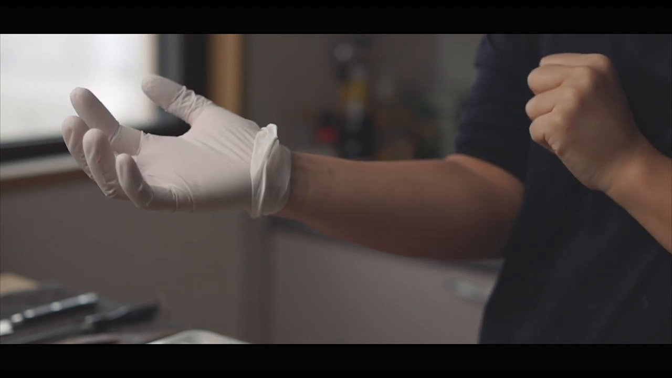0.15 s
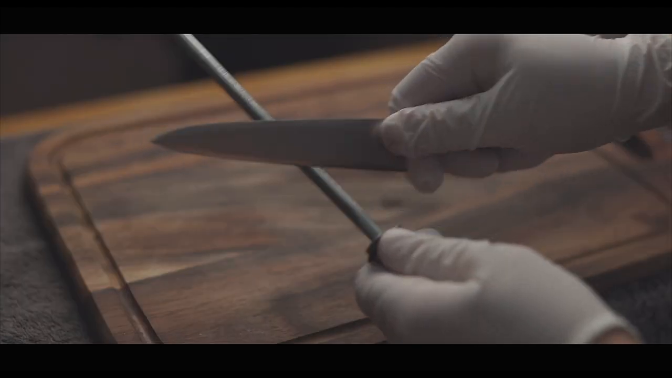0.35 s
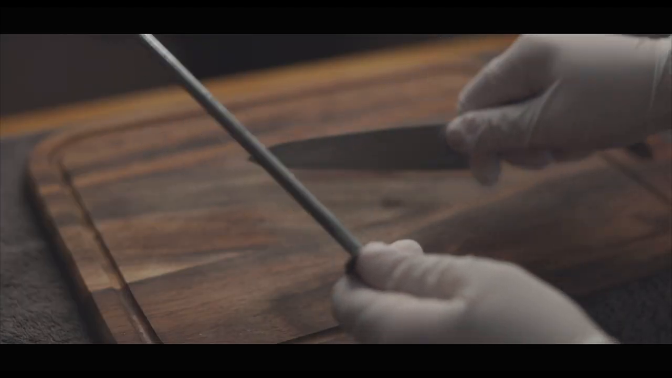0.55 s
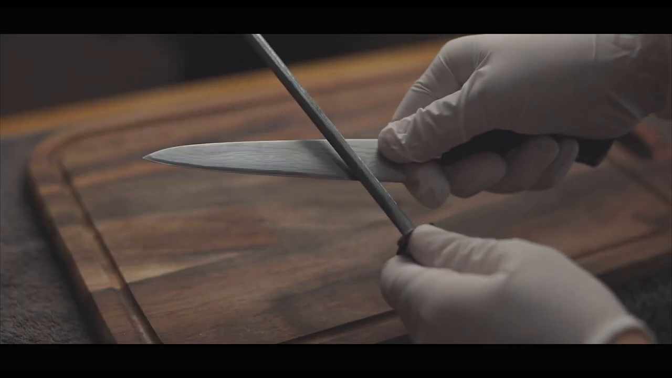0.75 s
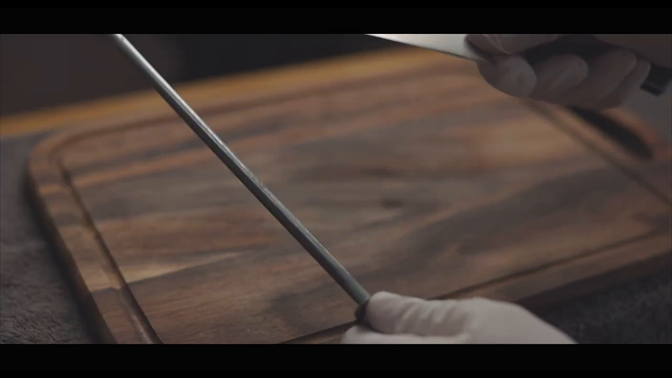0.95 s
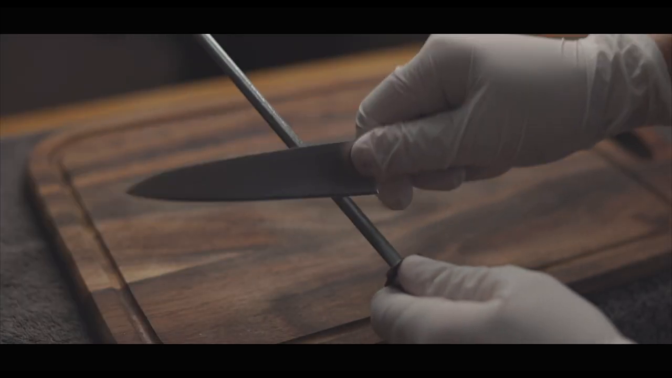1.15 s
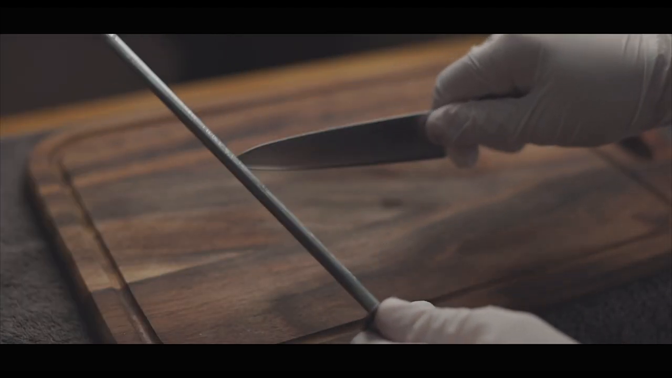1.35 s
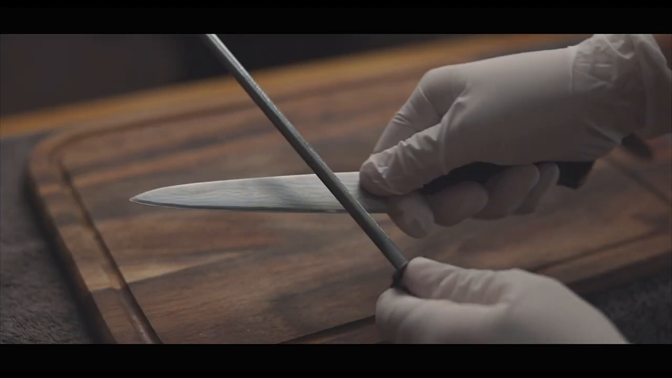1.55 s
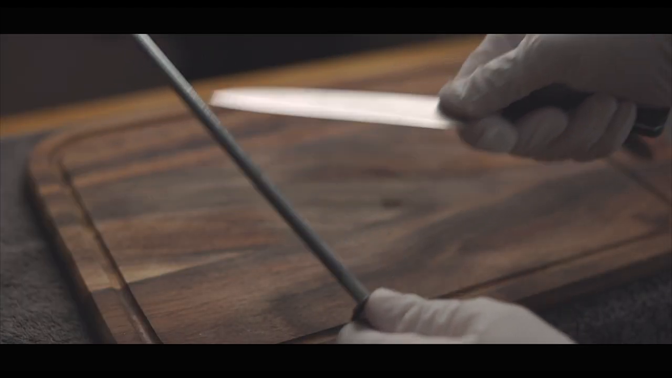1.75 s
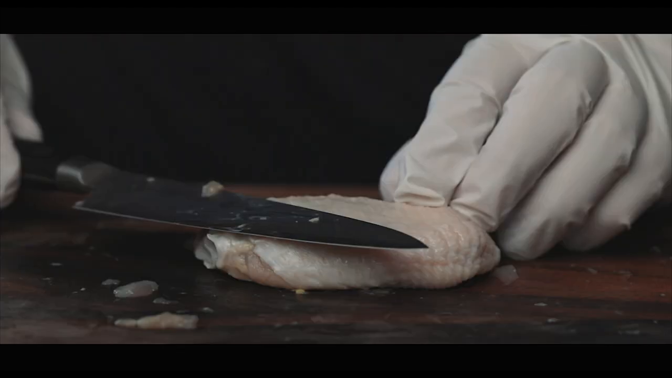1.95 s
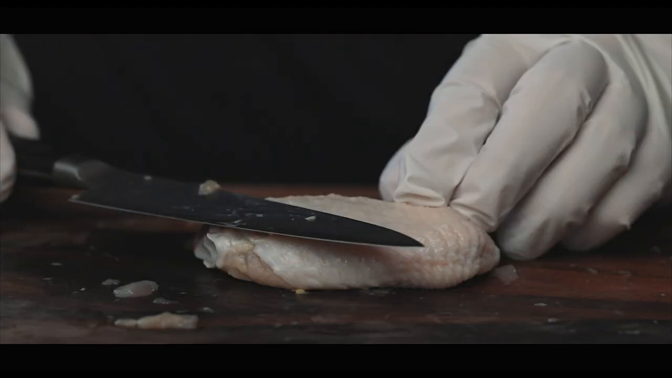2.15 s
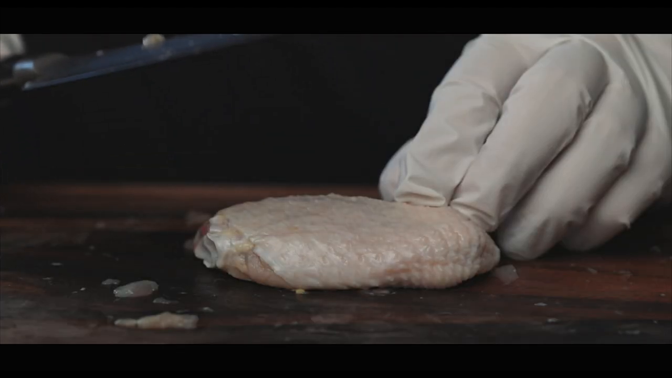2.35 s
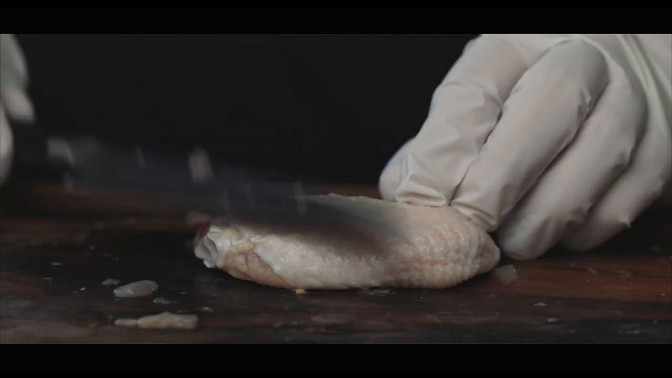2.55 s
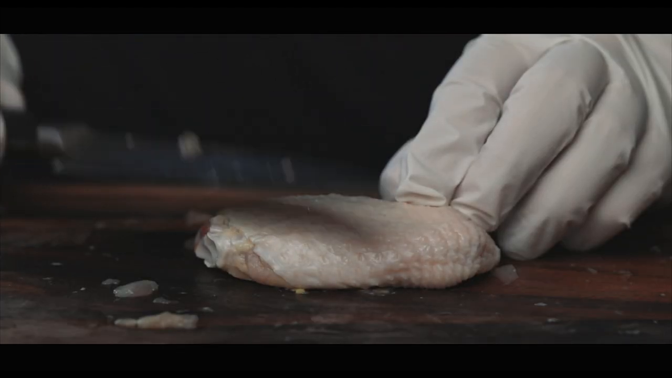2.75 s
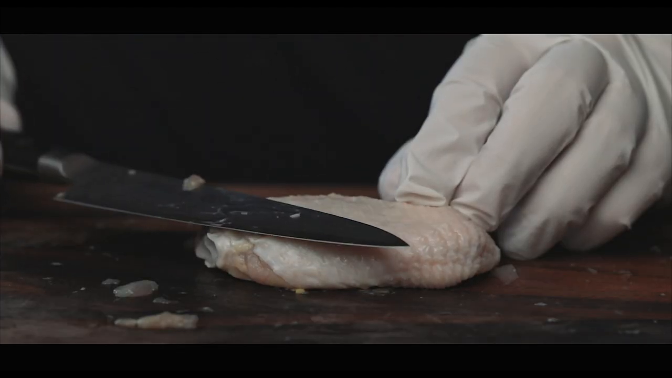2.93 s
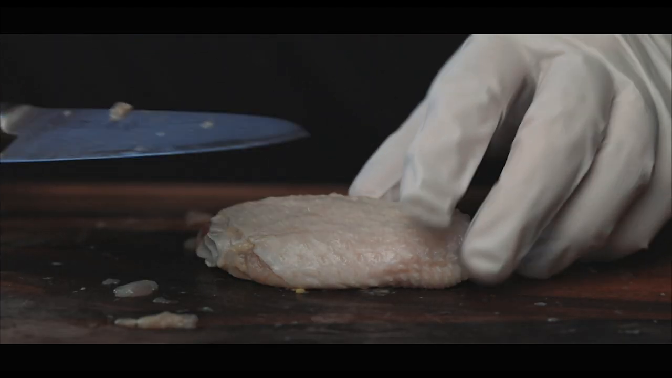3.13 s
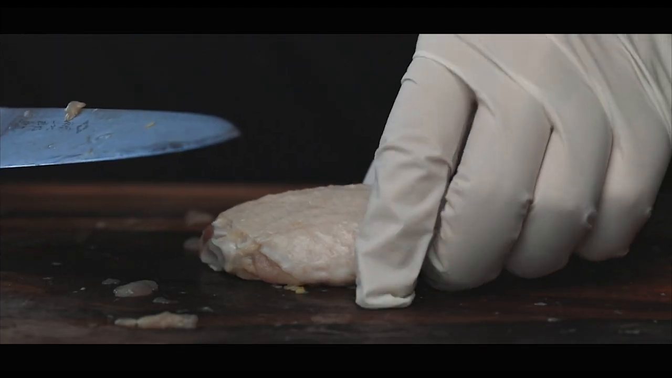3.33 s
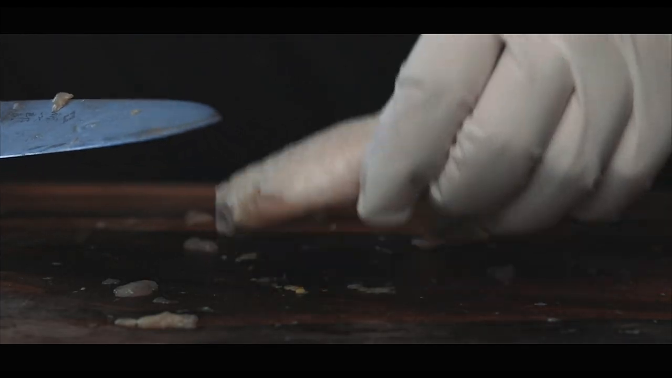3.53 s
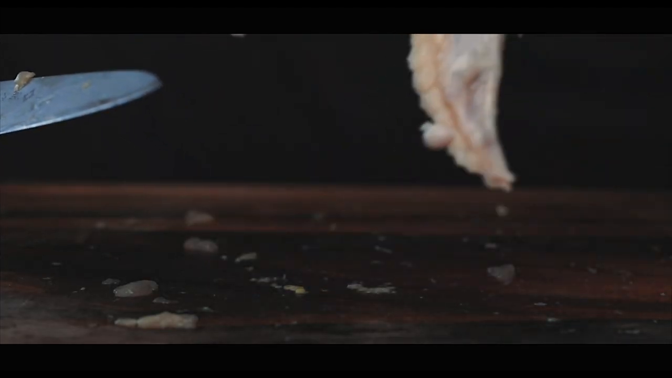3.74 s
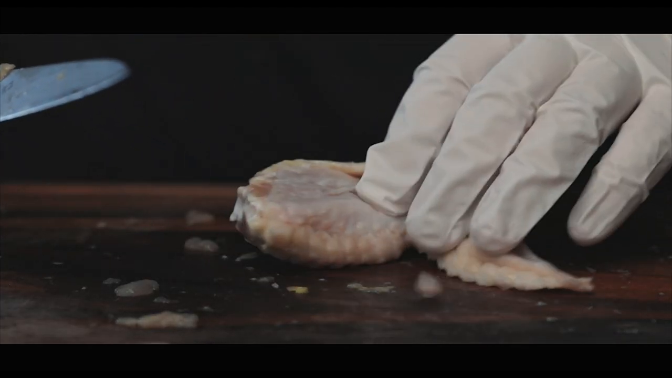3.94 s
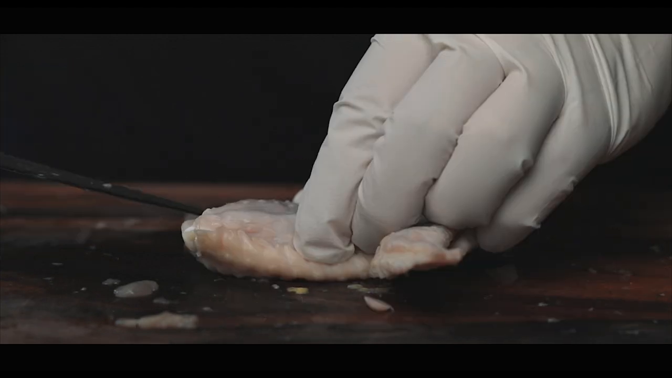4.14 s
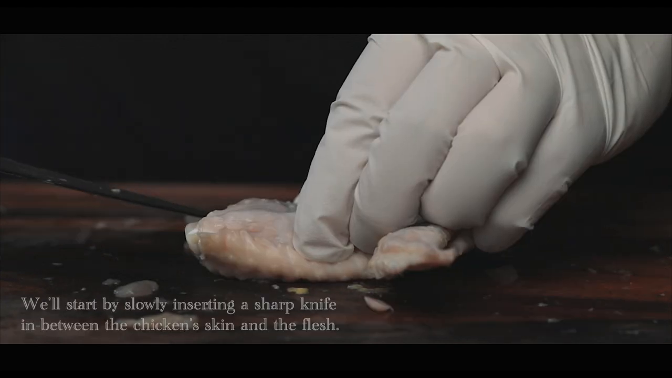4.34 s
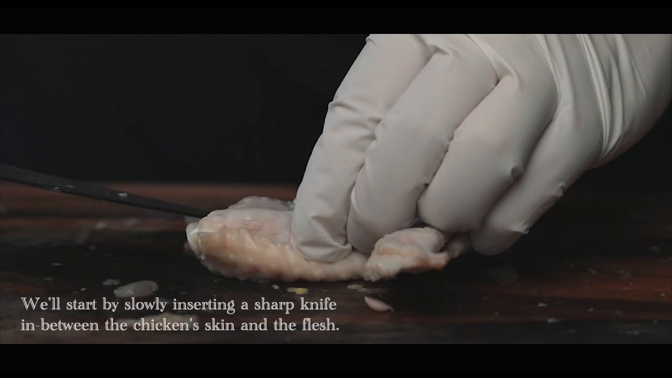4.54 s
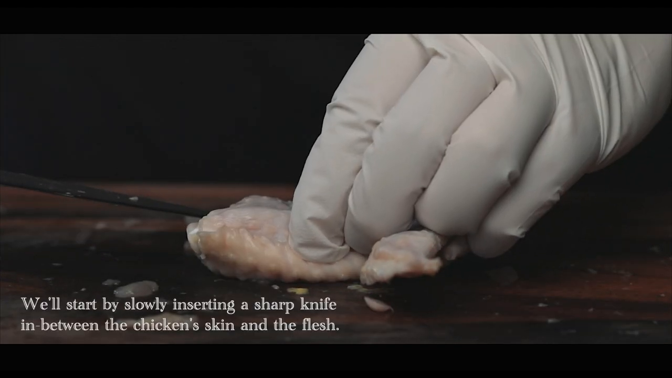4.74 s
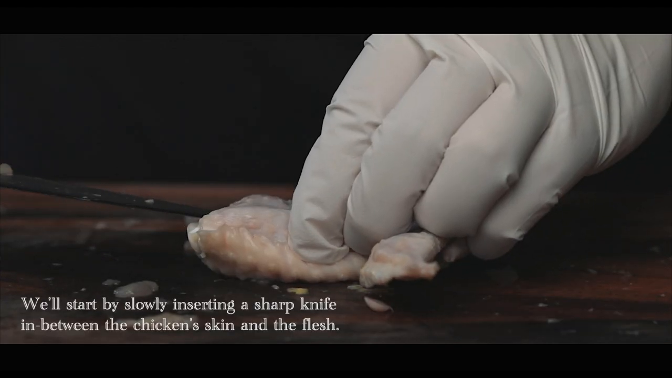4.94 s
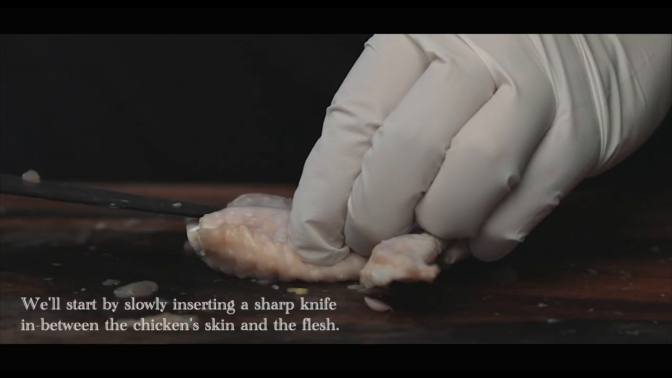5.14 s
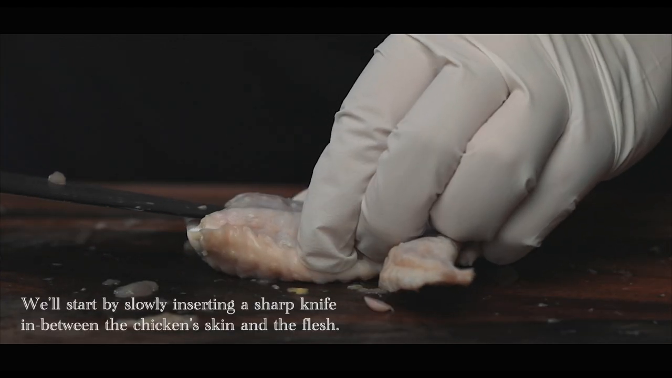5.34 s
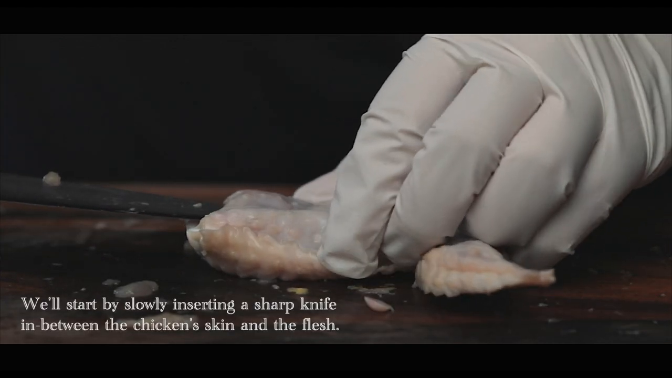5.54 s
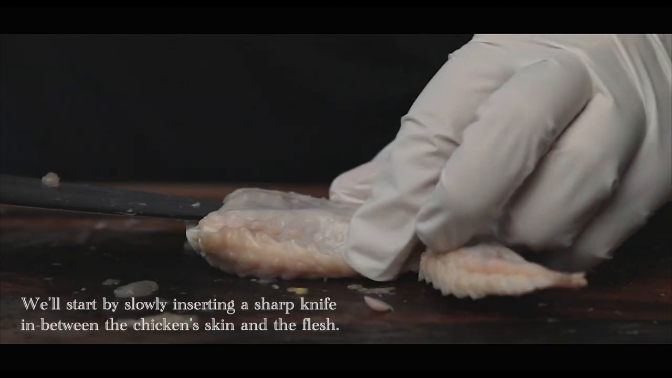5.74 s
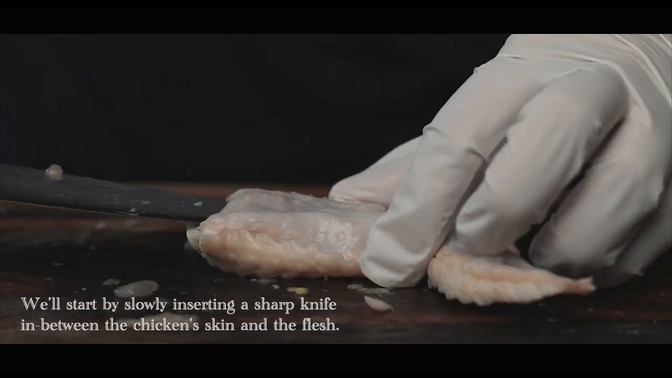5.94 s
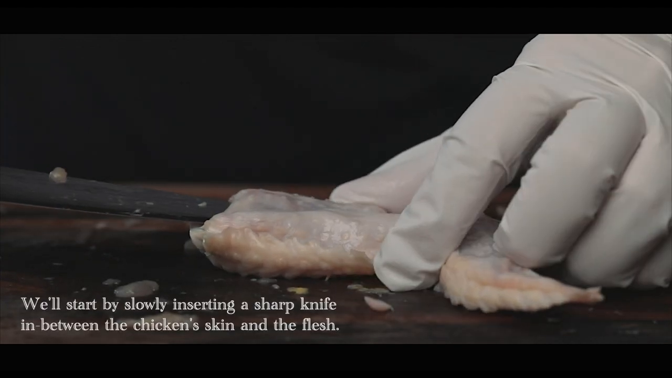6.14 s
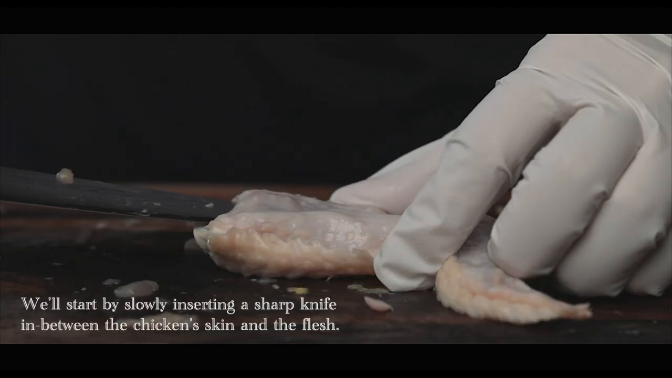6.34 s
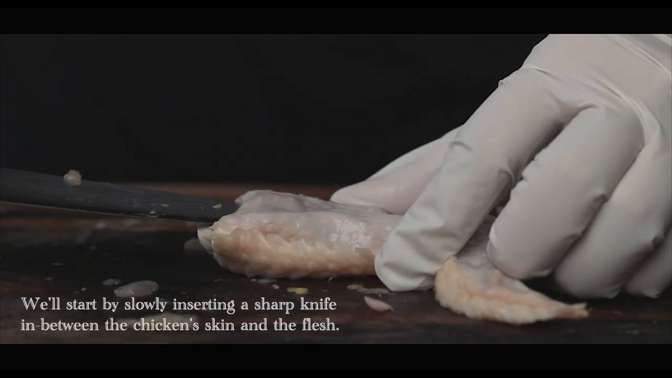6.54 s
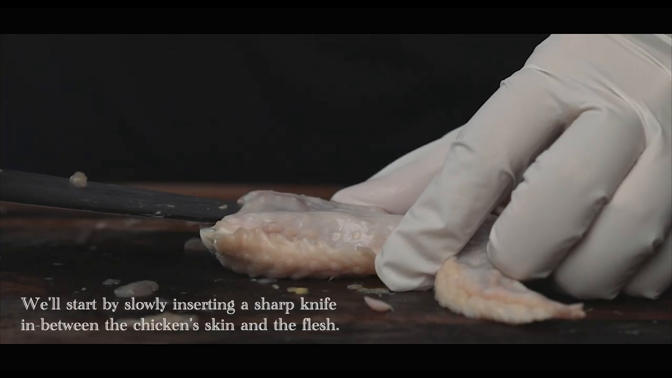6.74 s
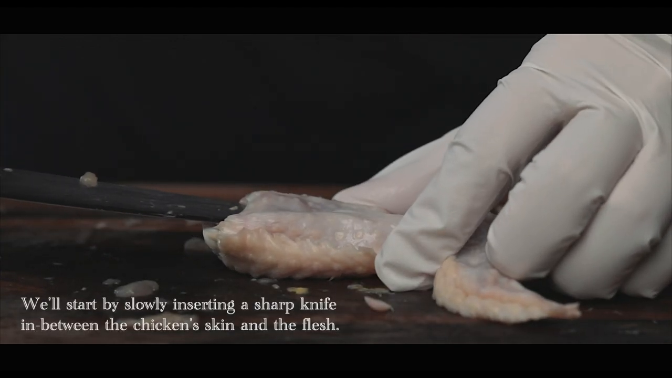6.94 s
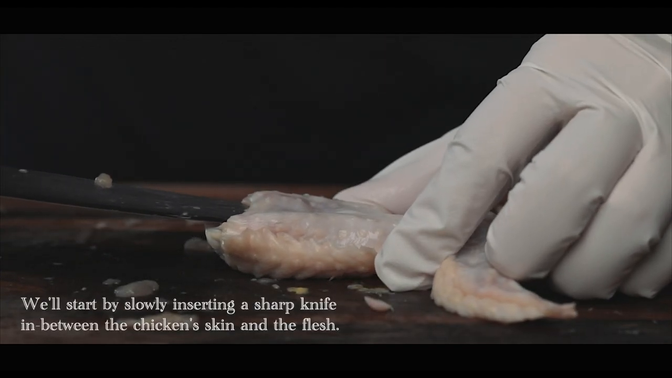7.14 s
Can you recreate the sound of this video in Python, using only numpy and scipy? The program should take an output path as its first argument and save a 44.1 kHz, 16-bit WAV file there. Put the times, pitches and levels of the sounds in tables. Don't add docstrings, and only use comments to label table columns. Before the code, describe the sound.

Close to the microphone in a quiet kitchen, the tail of a glove snap dies away, then a knife edge rasps down a honing steel four times, bright and ringing, the last stroke hardest. Afterwards soft knocks sound on a wooden board, with sharp ticks and wet rubbing, then a harder knock and slap as raw meat lands. Faint squelches, sparse sticky clicks and low wooden groans follow over gentle room hum.

```python
import sys
import numpy as np
from scipy import signal
from scipy.fft import rfft, irfft, next_fast_len
from scipy.io import wavfile
from scipy.ndimage import uniform_filter1d

SR = 44100
rng = np.random.default_rng(int(sys.argv[2]) if len(sys.argv) > 2 else 0)


def bounce(signal):
    frames = np.transpose(np.atleast_2d(signal))
    limited = np.clip(frames, -1, 1)
    pcm = np.round(limited * 32767).astype(np.int16)
    wavfile.write(sys.argv[1], SR, pcm)


def invert_db(x):
    u = np.asarray(x, float) / 20
    return 10 ** u


N = 321048
T = np.arange(N) / SR


def evened(x):
    return x / np.sqrt(np.mean(x ** 2) + 1e-20)


def noise(*shape):
    return rng.standard_normal(shape)


def read(points, hz):
    f, value = np.transpose(points)
    return np.interp(np.log(hz + 1), np.log(f + 1), value)


def add(mix, s, sound):
    part = mix[round(s * SR):][:len(sound)]
    part += sound[:len(part)]


def resonate(x, hz, width):
    turn = np.exp(2j * np.pi * np.cumsum(hz * np.ones(len(x))) / SR)
    r = np.exp(-np.pi * width / SR)
    return 2 * (turn * signal.lfilter([1 - r], [1, -r], x / turn)).real


def coloured(x, points):
    n = next_fast_len(len(x))
    gain = invert_db(read(points, np.fft.rfftfreq(n, 1 / SR)))
    return evened(irfft(rfft(x, n) * gain, n)[:len(x)])


def drift(count, size):
    return evened(uniform_filter1d(uniform_filter1d(noise(count), size), size))


def band(x, lo_hz, hi_hz):
    return evened(signal.sosfilt(signal.butter(2, [lo_hz, hi_hz], "band", fs=SR, output="sos"), x))


def above(x, hz):
    return signal.sosfilt(signal.butter(4, hz, "high", fs=SR, output="sos"), x)


def rings(modes, t, lift_db=0, above_hz=1e5, turn=0):
    total = 0
    for hz, db, t60 in modes:
        share = min(max(2 * hz / above_hz - 1, 0), 1)
        total = total + invert_db(db + lift_db * share - 60 * t / t60) * np.sin(2 * np.pi * (hz * t + turn))
    return total


def swells(rows, rise=None, fall=None):
    t = T[::32]
    curves = []
    for s, db, *shape in rows:
        growing = (s - t) / (rise or shape[0])
        dying = (t - s) / (fall or shape[1])
        curves.append(invert_db(db - 20 * np.where(t < s, growing, dying)))
    return np.array(curves)


def full(curve):
    return np.interp(T, T[::32], curve)


def noise_tail(x, t60s):
    hz, t, z = signal.stft(x, SR, nperseg=128)
    return signal.istft(z * invert_db(-60 * t / read(t60s, hz)[:, None]), SR, nperseg=128)[1]


def room(x, t60s, start):
    tails = noise_tail(noise(3, SR * 3 // 4), t60s)
    tails = tails * (np.arange(tails.shape[1]) > start * SR)
    turns = np.sqrt(2 / 3) * np.cos(2 * np.pi * (11 * T + np.arange(3)[:, None] / 3))
    return signal.oaconvolve(x * turns, tails / np.linalg.norm(tails[0]), axes=1).sum(0)[:N]


def background():
    # [f/Hz, density/dB]
    air_colour = [(18, -30.5), (30, -3.5), (51, -12), (106, -32.5), (227, -31.5), (473, -44), (540, -45),
                  (801, -38.5), (962, -51), (3140, -51.5), (7670, -45.5), (8300, -43), (9460, -47),
                  (12300, -41), (16000, -50.5)]
    # [f/Hz, level/dB, width/Hz]
    whines = [(222, -91, 12), (797, -98, 8), (8140, -89, 30), (12200, -95, 90)]
    out = invert_db(-72.5 + 1.4 * drift(N, size=9000)) * coloured(noise(N), air_colour)

    bustle_on = np.clip((2.55 - T) * 4, 0, 1)
    bustle = noise(N)
    murmur = (invert_db(-56 - 30 * T) + invert_db(-82.5)) * band(bustle, 60, 300)
    fade_s, fall_db_per_s, hush_db = 2.07, 19.5, -4
    hiss_db = -68 - fall_db_per_s * np.maximum(T - fade_s, 0) + hush_db * (T > fade_s)
    out += bustle_on * (murmur + invert_db(hiss_db) * band(bustle, 1100, 13000))

    waver = invert_db(4.9 * drift(N, size=12000))
    return out + waver * sum(invert_db(db) * evened(resonate(noise(N), hz, width)) for hz, db, width in whines)


def sway():
    # [t/s, level/dB]
    nudges = [(.37, -40.5), (1.11, -43), (1.79, -42), (2.29, -59), (3.0, -41), (3.2, -38), (4.06, -38.5),
              (4.46, -48.5), (5.3, -50), (5.88, -50.5), (6.24, -39), (6.72, -52), (7.12, -56)]
    # [t/s, level/dB]
    thuds = [(2.97, -46.5), (3.04, -53), (3.302, -46.5), (3.458, -50), (3.532, -54), (3.98, -36),
             (4.104, -45)]
    sway_hz, start_db, fall_db_per_s = 13.2, -16.5, 17
    change_s, next_change_s = .3513, 4.172
    free = invert_db(start_db - fall_db_per_s * T) * np.cos(2 * np.pi * sway_hz * (T - change_s))
    wobble = band(resonate(noise(N), sway_hz, 16.0), 5.3, 19.0)
    nudged = full(swells(nudges, rise=.25, fall=.2).sum(0)) * wobble
    out = np.where(T < change_s, free, nudged)

    rumble = band(band(noise(N), 31.06, 75), 27, 80)
    pressed = full(swells(thuds, rise=.045, fall=.1).sum(0)) * rumble
    jolt = invert_db(-38) * np.exp(-abs(T - next_change_s) / .012)
    return out + (pressed + jolt) * (T < next_change_s)


def snap():
    # [f/Hz, density/dB]
    snap_colour = [(59, -35), (100, -6), (163, -24), (910, -16), (1950, -20), (4470, -18), (6020, -27.5),
                   (9610, -27.5), (16000, -45.5)]
    # [f/Hz, t60/s]
    snap_t60 = [(200, .3), (2000, 0.26), (6000, 0.23), (15000, 0.18)]
    tail = invert_db(-26) * noise_tail(coloured(noise(SR), snap_colour), snap_t60)
    return np.pad(tail[:SR], (0, N - SR))


def board():
    # [t/s, peak/dB, hardness as lift of the upper modes/dB]
    knocks = [
        (2.6844, -21.5, -7),
        (2.8951, -23, -4),
        (3.966, -21.5, 14),
        (3.992, -34, 3),
        (4.198, -58, 6),
    ]
    # [f/Hz, level/dB, t60/s]
    board_modes = [(57.55, 2.5, 0.17), (124.1, -6.5, .1), (256.5, -12.5, 0.1), (298.8, 0, .08),
                   (466, 4, 0.031), (485, -20, 0.035), (590.3, -11, .06), (1000, -10.5, 0.016)]
    # [t/s, level/dB, rise/s, fall per 20 dB/s]
    groans = [(1.99, -74, .03, .06), (2.07, -76, .03, .05), (2.375, -66.5, 0.049, 0.1),
              (2.55, -80, .04, .04), (6.28, -76, 0.051, 0.15), (6.715, -60.5, 0.085, 0.14),
              (6.91, -64.5, .15, 0.1), (7.06, -77, .05, .02)]
    out, t = np.zeros(N), np.arange(SR // 2) / SR
    for s, db, hard_db in knocks:
        ringing = rings(board_modes, t, hard_db, above_hz=460, turn=0.18)
        add(out, s, -invert_db(db) * ringing * (1 - np.exp(-t / 0.0029)))
        counter_rattle = invert_db(db - 31.5 - 60 * t / .6) * band(noise(len(t)), 130, 450)
        add(out, s, counter_rattle * (1 - np.exp(-t / 0.0056)))

    groan_hz = 222 + 3.5 * drift(N, size=3000)
    tone = np.sqrt(2) * np.sin(2 * np.pi * np.cumsum(groan_hz) / SR)
    return out + full(swells(groans).sum(0)) * (tone + 0.14 * band(noise(N), 180, 400))


def patchy(x, depth_db):
    hz, t, z = signal.stft(x, SR, nperseg=256)
    field = noise(len(hz), len(t))
    field = evened(uniform_filter1d(uniform_filter1d(field, size=9, axis=0), size=7, axis=1))
    gain = invert_db(depth_db * field - .115 * depth_db ** 2)
    return signal.istft(z * gain, SR, nperseg=256)[1][:len(x)]


def rubbing():
    # [t/s, level/dB, rise/s, fall per 20 dB/s, centre of the wet hiss f/Hz]
    rubs = [(2.35, -76, .15, .12, 6000), (2.68, -60, 0.024, .01, 9200), (2.684, -36, .001, 0.0039, 10500),
            (2.703, -66.5, .01, 0.34, 9100), (2.894, -46.5, .003, 0.05, 9500),
            (2.915, -68.5, .01, 0.4, 8830), (3.175, -53.5, 0.05, 0.06, 5400), (3.272, -49, .04, 0.04, 9800),
            (3.31, -60, .08, .1, 5500), (3.4, -51, .12, 0.08, 5200), (3.435, -56, .06, .04, 4600),
            (3.506, -47, 0.012, .03, 5500), (3.516, -49, .015, .012, 5500), (3.535, -61, .03, .15, 5000),
            (3.668, -50, .08, 0.09, 7000), (3.725, -53, .008, .01, 8700), (3.83, -63, 0.1, 0.1, 4500),
            (3.943, -50, .002, 0.0776, 5500), (3.997, -46, .01, .02, 7500), (4.04, -57, .1, 0.07, 7300),
            (4.105, -58, .1, 0.02, 4600), (4.27, -67, 0.07, 0.12, 8240), (5.214, -71, .022, 0.23, 4620),
            (5.45, -73, .1, 0.45, 6500), (5.66, -64, 0.15, 0.1, 7400), (5.715, -62, .06, .1, 6000),
            (5.803, -44, .025, 0.035, 7400), (5.85, -55, .08, 0.04, 6000), (5.93, -70, .08, .08, 5200),
            (6.01, -70, .04, .05, 5000), (6.095, -60, .06, .08, 7000), (6.15, -56, .08, 0.06, 6500),
            (6.185, -63, .04, .04, 6500), (6.255, -61, 0.05, 0.06, 6500), (6.295, -65, .03, .02, 6000),
            (6.36, -75, .1, 0.55, 7500)]
    each = swells(rubs) + 1e-9
    level = full(each.sum(0))
    centre_hz = full(np.transpose(rubs)[4] @ each ** 2 / (each ** 2).sum(0))
    octave = np.log2(centre_hz / 6500)

    hiss = noise(3, N)
    crackle = 2.4 * noise(N)
    crackle_per_s = 800 * invert_db(6.0 * drift(N, size=500))
    fizz = hiss + crackle * (rng.random(N) < crackle_per_s / SR)

    squelch = band(band(fizz[0], 1100, 2300), 1500, 5970)
    squelch = squelch + .4 * band(band(fizz[2], 460, 750), 440, 860)
    cavity_hz = 1700 * (1 + 0.1509 * drift(N, size=4000))
    squelch = squelch + 0.46 * evened(resonate(fizz[0], cavity_hz, 130.0))
    squelch_gain = invert_db(-10.5 - 3.5 * octave) * (level / invert_db(-58)) ** (0.99 - 1) * (level > invert_db(-95))

    glove = band(above(fizz[2], 8600), 6000, 15000)
    crinkle = invert_db(-3.5 + 7 * octave + 2.5 * drift(N, size=120)) * glove

    body = invert_db(-5.0 * octave) * band(fizz[1], 3700, 7300)
    focus = 1.2 * evened(resonate(resonate(fizz[1], centre_hz, 2200.0), centre_hz, 2500.0))
    wet = evened(body + focus) * invert_db(1.2 * drift(N, size=300))
    mixed = evened(wet) + squelch_gain * evened(squelch) + crinkle
    return level, invert_db(-3.5) * level * patchy(mixed, depth_db=2.2)


def ticks(rows):
    grains = noise(len(rows), 600)
    out, t = np.zeros(N), np.arange(600) / SR
    peak_db = np.transpose(rows)[1][:, None]
    clicks = grains * np.exp(-t / (0.0004 * invert_db(0.45 * (peak_db + 51.5))))
    plops = band(band(clicks, 1100, 2800), 1100, 3500)
    for (s, db, hz), click, low in zip(rows, clicks, plops):
        cavity = resonate(resonate(click, .88 * hz, .5 * hz), .88 * hz, hz)
        high = np.diff(cavity, n=2, prepend=[0, 0])
        low_db = -29 - 22 * np.log2(max(hz, 4000) / 6500)
        both = high / abs(high).max() + invert_db(low_db) * low / abs(low).max()
        add(out, s + 0.000972, invert_db(db - 1.5) * both)
    return out


def meat():
    # [t/s, level/dB,
    # f/Hz, length/s]
    squeaks = [(2.14, -80, 680, .17), (2.2, -80, 450, .18), (2.45, -80, 450, .11), (2.98, -70.5, 670, 0.16),
               (3.16, -62, 1560, 0.036), (3.34, -68, 593, 0.065), (3.33, -66, 1900, 0.07),
               (3.5, -62, 1900, .04), (3.6, -68, 1300, .07), (3.63, -66, 2000, .07),
               (3.675, -65, 1250, 0.025), (4.02, -62, 1950, .05), (4.071, -55, 1900, 0.02),
               (4.245, -72, 1250, 0.07), (4.25, -70, 648, 0.07), (5.22, -78, 1850, .16),
               (5.495, -77, 643, 0.15), (5.66, -76, 1350, .05), (5.66, -76, 2600, 0.08),
               (5.7, -76, 1850, .06), (5.785, -66, 480, .025), (5.81, -68, 620, .03),
               (5.79, -64, 1450, .03), (5.815, -66, 1183, 0.03), (5.81, -62, 2050, .045),
               (5.83, -66, 950, .04), (6.08, -71, 1100, 0.035), (6.13, -69, 1120, .075),
               (6.05, -76, 2000, .1), (6.13, -76, 2800, .09), (6.364, -93, 2556, .45),
               (4.26, -72.5, 260, 0.05), (5.302, -79, 225, 0.15)]
    # [t/s, peak/dB, centre f/Hz]
    small_contacts = [(2.281, -62, 9000), (2.311, -58, 9500), (2.585, -62, 10000), (2.6688, -48, 4460),
                      (2.6826, -15.5, 12400), (2.8917, -20.5, 10000), (3.004, -48.5, 10400),
                      (3.0762, -48, 7900), (3.117, -47, 8050), (3.142, -31, 5200), (3.1437, -31, 4500),
                      (3.2395, -25, 10500), (3.365, -42, 12000), (3.387, -41, 12500), (3.398, -37, 8500),
                      (3.424, -41, 12000), (3.442, -39, 6000), (3.5062, -33, 4600), (3.5315, -42, 3000),
                      (3.541, -39, 7000), (3.614, -46, 11000), (3.628, -45, 9500), (3.7097, -32.5, 8600),
                      (3.7476, -48, 8700), (3.7853, -40, 8000), (3.7877, -38, 12000), (3.83, -44, 5570),
                      (3.868, -48, 12000), (3.9055, -37, 12000), (3.9407, -16, 3600), (3.9972, -17, 7000),
                      (4.1987, -50.5, 8230), (4.6663, -46, 12200), (5.0794, -54, 12360), (5.2161, -34, 12000),
                      (5.373, -56, 3000), (5.389, -56, 3000), (5.3986, -44, 5200), (5.459, -54, 5000),
                      (5.488, -52, 4900), (5.4954, -44, 9450), (5.513, -52, 11000), (5.548, -50, 6500),
                      (5.579, -45, 8000), (5.586, -46, 12500), (5.612, -49, 5670), (5.642, -37, 7000),
                      (5.6657, -31, 12360), (5.7062, -42, 7220), (5.72, -47, 6500), (5.7946, -31, 9960),
                      (5.949, -48, 7000), (6.047, -52, 5000), (6.0766, -46, 9000), (6.175, -42, 8000),
                      (6.181, -44, 11000), (6.354, -53, 4000), (6.371, -55, 3000), (6.3772, -52, 7600),
                      (6.5676, -53, 11000),
                      (1.951, -58, 1200), (2.6835, -34, 1600), (2.8935, -36, 1900), (3.817, -55, 1100),
            (3.9055, -48, 1800), (4.073, -42, 2400), (4.15, -56, 1580), (4.265, -54, 1300),
            (5.2165, -50, 4000), (5.838, -49, 1500), (6.048, -66, 900), (6.091, -60, 1500),
            (6.175, -54, 1600)]
    level, out = rubbing()
    for s, db, hz, length in squeaks:
        air = noise(round(length * SR))
        tone = evened(resonate(resonate(air, hz, 80.0), hz, 220.0))
        add(out, s, invert_db(db) * tone * np.hanning(len(air)))

    slap_s, slap_db, slap_t60 = 3.9418, -30.5, .05
    slap = band(band(noise(4000), 700, 4200), 600, 4500)
    add(out, slap_s, invert_db(slap_db - 60 * T[:4000] / slap_t60) * slap)

    strays_per_s, stray_db = 40, 7
    strays = []
    for place, size, pitch in rng.random((round(strays_per_s * N / SR), 3)):
        here = level[int(place * N)]
        if here > invert_db(-80):
            db = stray_db + 6 * size + 20 * np.log10(here)
            strays.append((place * N / SR, db, 4500 * 2.8 ** pitch))
    return out + ticks(small_contacts + strays)


def flares():
    # [t/s, level/dB, f/Hz, length/s]
    singing = [(.385, -64, 1850, .04), (.39, -58, 9500, .025), (.428, -50, 2240, .045),
               (.44, -57, 890, .055), (.445, -50, 2800, .04), (.45, -47, 7020, .025),
               (.45, -38, 10930, .035), (.465, -33, 12900, .03), (.47, -50, 1960, .03),
               (.488, -36, 8170, .022), (.49, -42, 5000, .03), (.495, -44, 2570, .035),
               (.865, -45, 9190, .03), (.892, -50, 930, .035), (.892, -48, 2450, .03),
               (.89, -48, 2790, .04), (.93, -35, 5800, .022), (.93, -35, 8310, .025),
               (.935, -46, 1800, .02), (.95, -38, 5180, .035), (.95, -39, 7070, .03),
               (.95, -43, 2716, .025), (1.275, -52, 910, .1), (1.295, -45, 9274, .03),
               (1.31, -49, 4840, .03), (1.31, -50, 6210, .03), (1.345, -44, 4810, .035),
               (1.34, -50, 2633, .03), (1.395, -35, 9315, .025), (1.4, -40, 2640, .04),
               (1.4, -43, 5065, .04), (1.42, -46, 6230, .025), (1.735, -49, 2135, .03),
               (1.748, -36, 2255, .035), (1.752, -33, 2790, .045), (1.748, -38, 4790, .03),
               (1.765, -38, 7050, .03), (1.765, -38, 9060, .035), (1.77, -40, 2580, .04),
               (1.745, -53, 880, .045), (1.788, -34, 4840, .035), (1.788, -34, 5900, .03),
               (1.79, -38, 3500, .045), (1.805, -36, 2045, .035), (1.81, -40, 2300, .04),
               (1.81, -39, 8790, .025), (1.79, -30, 14850, .022), (1.81, -27, 14670, .022),
               (1.81, -30, 12490, .022), (.49, -28, 11400, .018)]
    out = np.zeros(N)
    wavers = drift(len(singing) * 4500, size=40).reshape(len(singing), -1)
    for (s, db, hz, length), waver in zip(singing, wavers):
        n = min(round(length * SR), len(waver))
        tone = np.sin(2 * np.pi * np.cumsum(hz + 90 * waver[:n]) / SR)
        add(out, s, invert_db(db + 3) * tone * signal.windows.tukey(n, .6))
    return out


def stroke(rows, heel_db, tip_db):
    # [f/Hz, width/Hz, level/dB]
    blade_modes = [(880, 110, -34), (2150, 140, -10), (2740, 130, -14), (3500, 160, -21), (4800, 110, -13),
                   (5900, 160, -13), (7000, 140, -14), (8280, 160, -11), (9300, 140, -8), (10900, 150, -8),
                   (11450, 110, -8), (12650, 140, -3), (13500, 130, -5), (14300, 150, -7), (15000, 220, 1)]
    # [f/Hz, density/dB]
    scrape_colour = [(180, -73.5), (300, -40.5), (2740, -7.5), (4910, -19.5), (5340, -19), (5800, -13),
                     (9880, -12), (15000, -1.5), (16000, -7)]
    times, pressures_db = np.transpose(rows)
    start, lift_off, end = times[0], times[-2], times[-1]
    t = np.arange(start, end, 1 / SR)
    n, spare = len(t), SR // 4
    on = np.clip(np.minimum(t - start, end - t) / 0.0017, 0, 1)
    pressure_db = np.interp(t, times, pressures_db)
    bright_db = np.interp(start + np.arange(n) / SR, [start, lift_off, end], [heel_db, tip_db, tip_db - 22])

    grit = (noise(spare) * invert_db(4 * drift(spare, size=90)))[:n]
    climb = np.linspace(.96, 1.04, n)
    blade = 0
    for hz, width, db in blade_modes:
        flare_db = 4.0 * np.tanh(drift(spare, size=330)[:n])
        mode = resonate(noise(n), hz * climb * rng.uniform(0.97, 1.01), width)
        blade = blade + invert_db(db + flare_db) * evened(mode)
    both = evened(blade) + invert_db(-1.5) * coloured(grit, scrape_colour)

    high = above(both, 7800) * invert_db(1.2 * drift(spare, size=60)[:n])
    tip = np.linspace(0, 1, n) ** 2
    low = band((1 - tip) * both + tip * above(both, 1500), 650, 7200)
    return start, on * invert_db(pressure_db + 3) * (low + invert_db(bright_db) * evened(high))


def steel():
    # [t/s, peak/dB]
    landings = [
        (0.809, -10),
        (1.233, -12.5),
        (1.663, -15.5),
    ]
    # [f/Hz, level/dB, t60/s]
    rod_modes = [(1300, -3, .07), (1755, -2, .15), (2600, 0, .2), (3429, -2, .16), (4199, -6, .08),
                 (4700, -12, .3), (5992, -4, .25), (6880, -13, .3), (8027, -14, .3), (9200, -5, .1),
                 (11470, -1, .13), (11580, -2, .22), (12380, -12, .2), (14690, -10, .05)]
    # [f/Hz, density/dB]
    clack_colour = [(120, -64), (200, -33.5), (735, -15), (1020, -18), (1300, -5.5), (2210, -11),
                    (2560, -2), (4040, -25), (5840, -7.5), (7270, -18.5), (11500, -7), (13800, -9.5),
                    (16000, -27)]
    # [t/s, pressure/dB]
    strokes = [
        [(0.36, -72), (0.378, -73.5), (0.452, -46), (0.484, -44), (0.498, -39), (0.508, -43)],
        [(0.822, -39), (0.862, -48), (0.92, -45), (0.94, -35), (0.96, -35), (0.968, -43)],
        [(1.245, -41), (1.287, -48), (1.39, -41), (1.408, -39), (1.424, -43)],
        [(1.675, -41), (1.707, -48.5), (1.737, -47), (1.768, -31), (1.827, -30), (1.836, -35)],
    ]
    # [at the heel/dB, at the tip/dB]
    shines = [(5.5, 16), (-5, 14), (-2, 17), (-9, 7)]
    # [t/s, level/dB, centre f/Hz, length/s]
    slips = [(.458, -32, 12500, .011), (.47, -30, 13500, .018), (0.4895, -20.5, 13700, 0.017),
             (.92, -30, 14000, .012), (0.9325, -19, 15100, 0.007), (0.944, -21, 12800, 0.011),
             (.9555, -21, 13800, 0.005), (1.33, -30, 13500, .008), (1.3478, -27, 14500, .004),
             (1.3645, -21, 13700, 0.006), (1.375, -30, 13000, .012), (1.393, -20, 13600, 0.018),
             (1.79, -28, 13000, .005), (1.8015, -22, 14500, 0.005), (1.812, -24, 14460, 0.014),
             (1.828, -19, 13100, 0.003)]
    out, t = np.zeros(N), np.arange(SR // 4) / SR
    for s, db in landings:
        clack = coloured(noise(len(t)), clack_colour) * invert_db(-60 * t / 0.02)
        add(out, s + .001, invert_db(db - 6) * (clack + invert_db(-16.5) * rings(rod_modes, t)))

    for rows, (heel_db, tip_db) in zip(strokes, shines):
        add(out, *stroke(rows, heel_db, tip_db))

    for s, db, hz, length in slips:
        n = round(length * SR)
        burst = resonate(resonate(noise(1200), hz, 3600.0), .9 * hz, 7000.0)
        burst = evened(above(burst, 2500))
        add(out, s, invert_db(db + 1.5) * burst[:n] * signal.windows.tukey(n, .4))

    song_s, song_length_s, song_db = 5.205, .17, -86
    rub = noise(round(song_length_s * SR))
    song = 0
    for hz in (1854, 2600, 3600, 3930, 4740, 5290):
        mode = evened(resonate(resonate(rub, hz, 150.0), hz, 300.0))
        song = song + mode * invert_db(4.35 * drift(len(rub), size=900))
    add(out, song_s, invert_db(song_db) * song * signal.windows.tukey(len(rub), .3))
    return above(out, 440)


def scene():
    # [f/Hz, t60/s]
    kitchen_t60 = [(100, 0.3), (600, .36), (1300, 0.28), (3000, 0.28), (9000, 0.25), (15000, 0.08)]
    # [f/Hz, t60/s]
    beyond_t60 = [(300, .8), (2000, 0.43), (6000, 0.46), (12000, 0.23)]
    glove, honing, wood, hands, sung = snap(), steel(), board(), meat(), flares()
    stirred = honing + invert_db(-9) * sung
    wet = room(invert_db(-8) * stirred, kitchen_t60, 0.0029)
    wet = wet + room(invert_db(-19) * wood + invert_db(-14.5) * hands, kitchen_t60, 0.0033)
    far = room(invert_db(-29.5) * stirred + invert_db(-25) * glove, beyond_t60, 0.014)
    mix = glove + sway() + honing + sung + wood + hands + wet + far + background()
    return np.tile(mix, (2, 1))


def top_cut(x):
    return signal.sosfilt(signal.butter(12, 16530, fs=SR, output="sos"), x)


def record(dry):
    mid = signal.oaconvolve(dry[0], signal.firwin(401, 15850, window=("kaiser", 5), fs=SR), "same")
    hz, t, z = signal.stft(mid, SR, nperseg=2048)
    hz = hz[:, None]
    level = np.sqrt(abs(uniform_filter1d(abs(z) ** 2, size=30, axis=0)))
    chosen = np.repeat(rng.random((33, len(t))) < .75, 32, axis=0)[:len(hz)]
    loud = level > invert_db(-74 + hz / 1100)
    hissy = chosen & loud & (hz > 4200) & (t > .3) & (t < 2.2)
    fresh = level * hissy * invert_db(-12.0 * (hz > 11000)) * np.exp(2j * np.pi * rng.random(z.shape))
    side = invert_db(-3.5) * signal.istft(fresh, SR, nperseg=2048)[1][:N]
    return top_cut(np.array([mid + side, mid - side]))


dry = scene()
out = record(dry)
bounce(out)
```